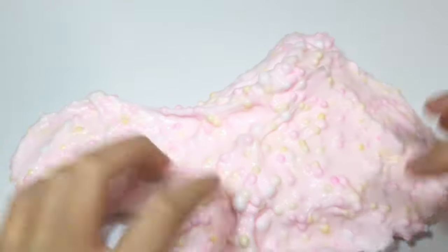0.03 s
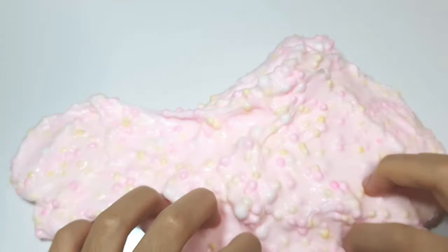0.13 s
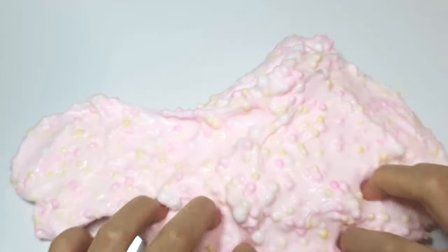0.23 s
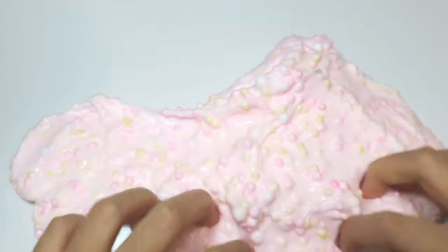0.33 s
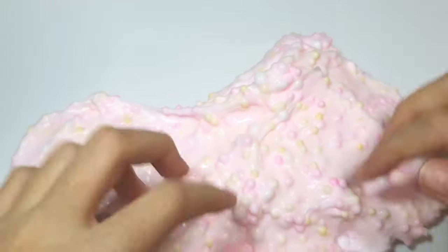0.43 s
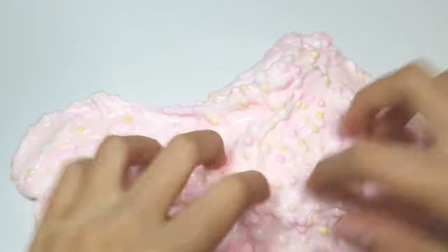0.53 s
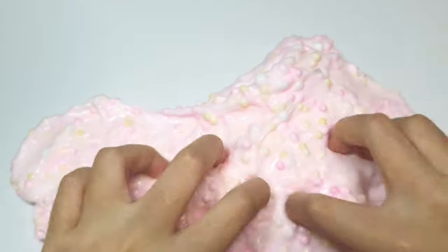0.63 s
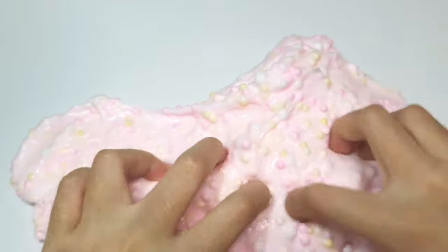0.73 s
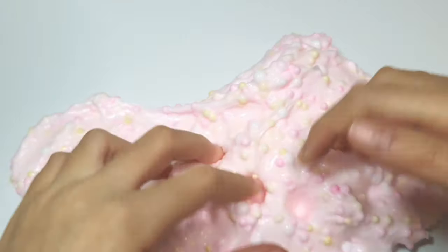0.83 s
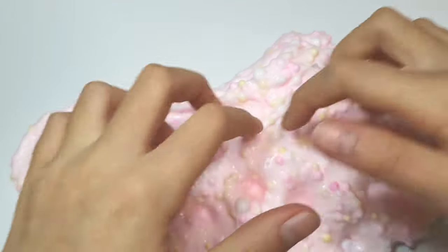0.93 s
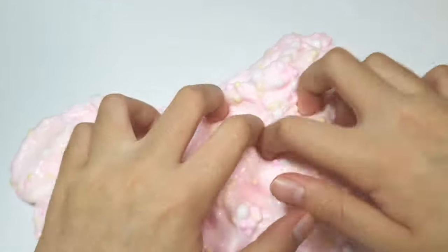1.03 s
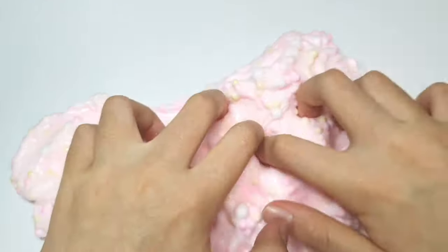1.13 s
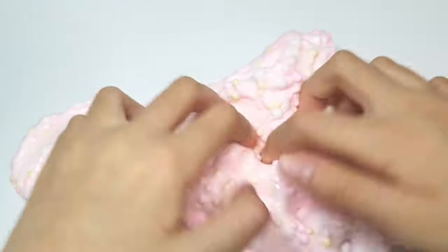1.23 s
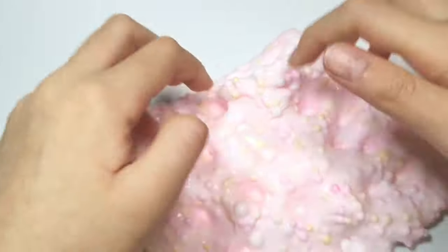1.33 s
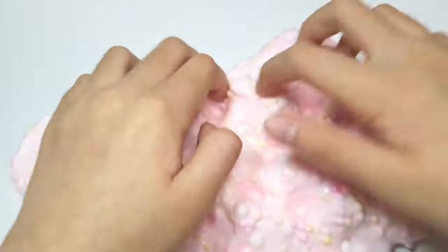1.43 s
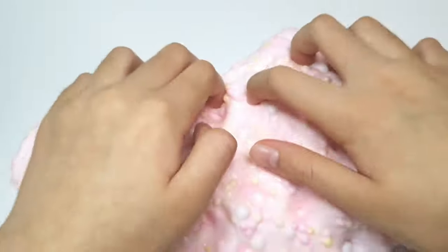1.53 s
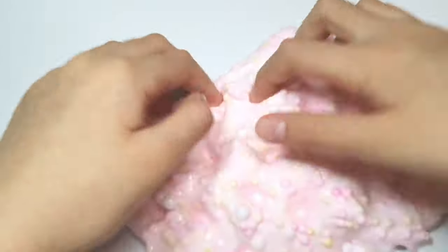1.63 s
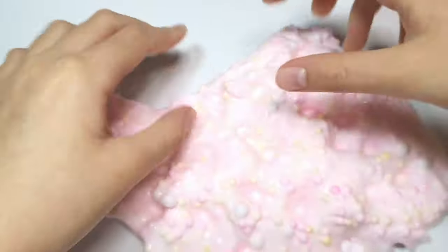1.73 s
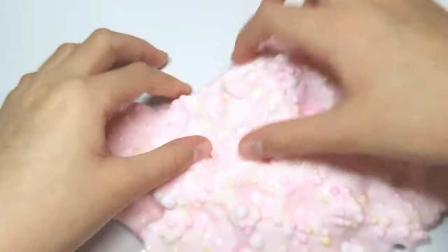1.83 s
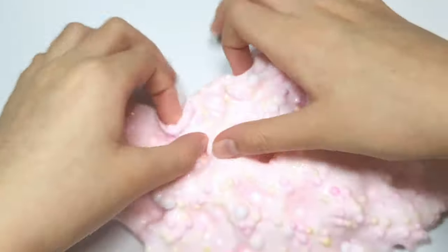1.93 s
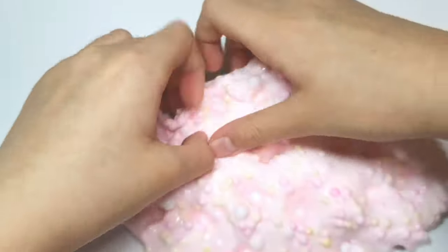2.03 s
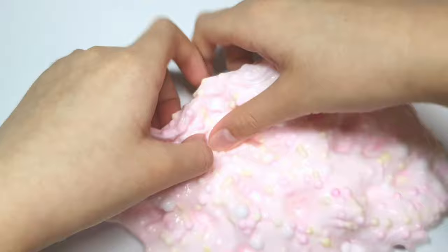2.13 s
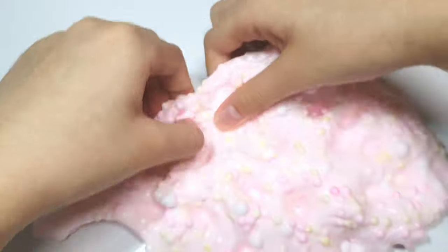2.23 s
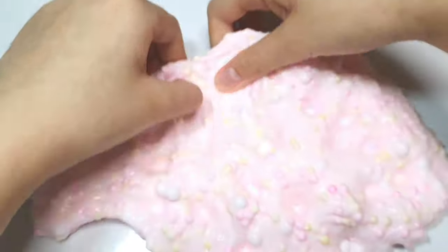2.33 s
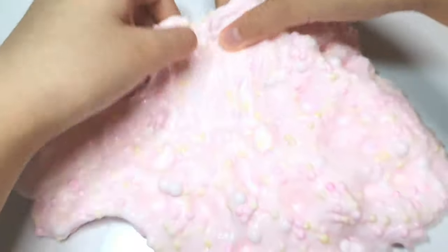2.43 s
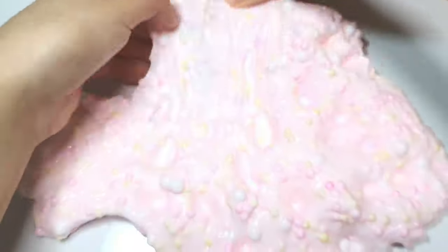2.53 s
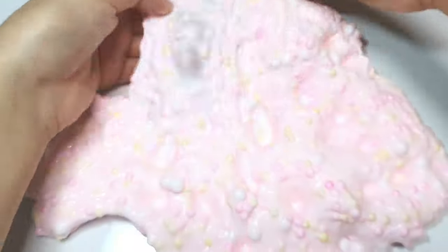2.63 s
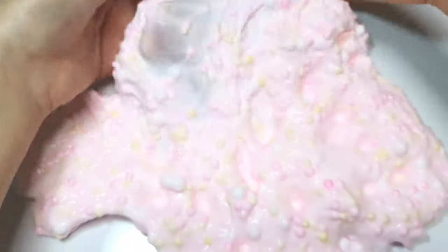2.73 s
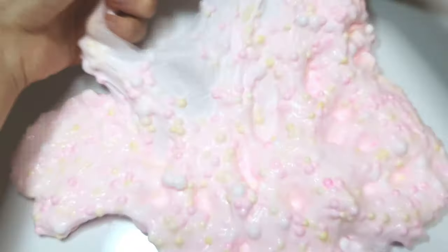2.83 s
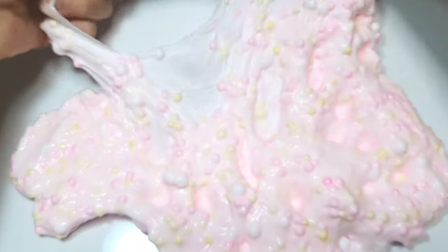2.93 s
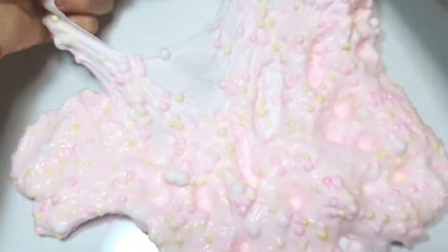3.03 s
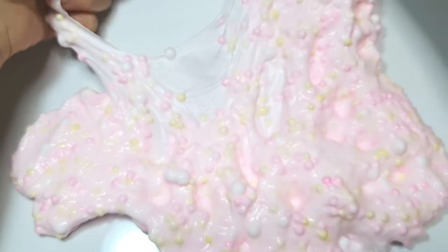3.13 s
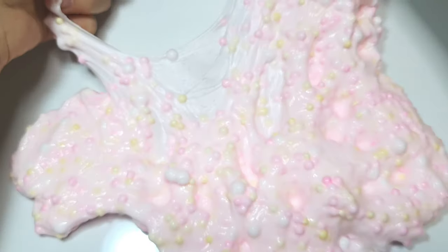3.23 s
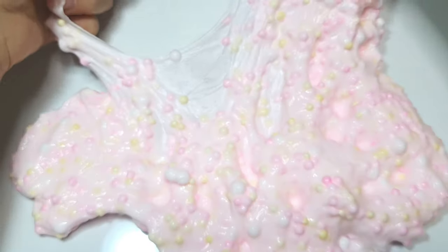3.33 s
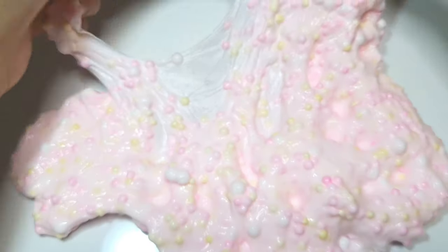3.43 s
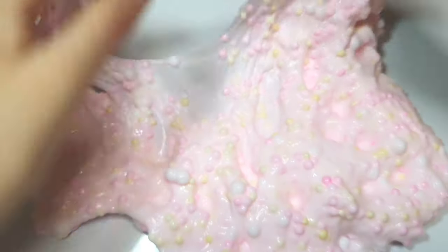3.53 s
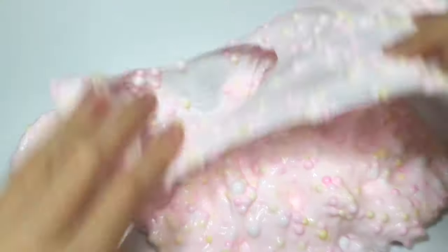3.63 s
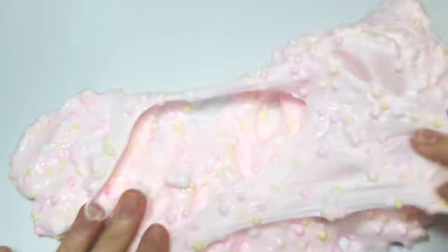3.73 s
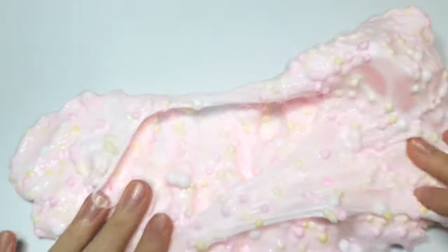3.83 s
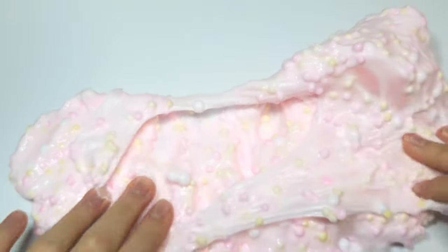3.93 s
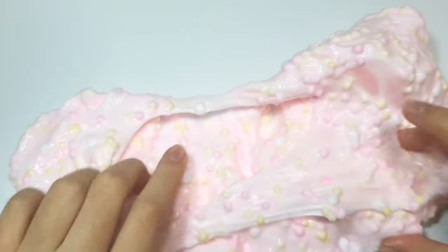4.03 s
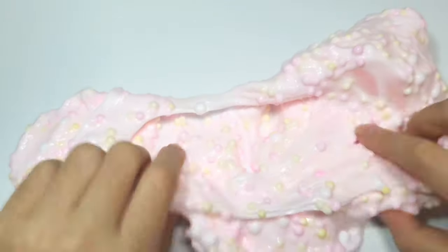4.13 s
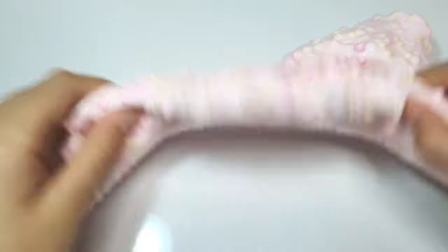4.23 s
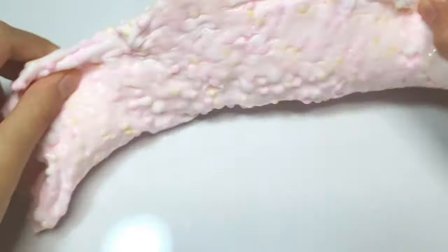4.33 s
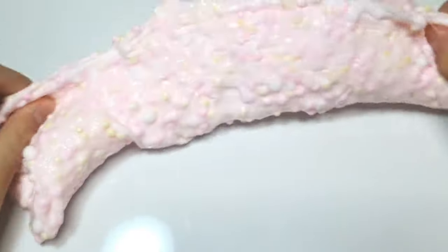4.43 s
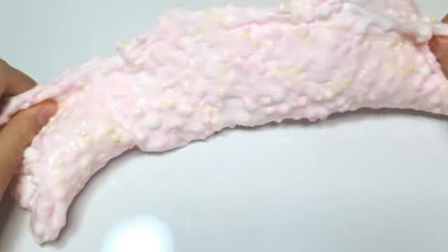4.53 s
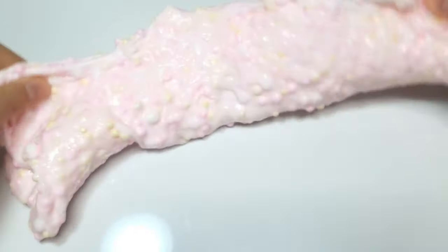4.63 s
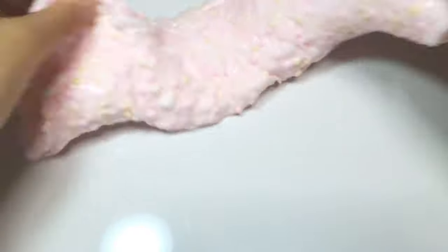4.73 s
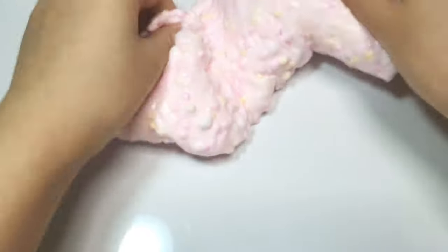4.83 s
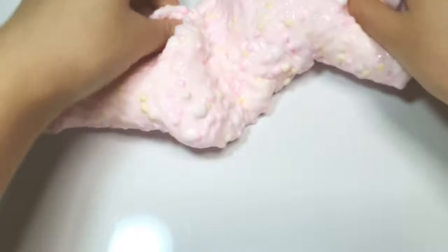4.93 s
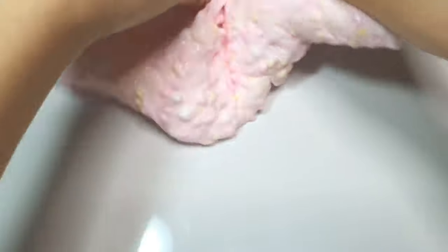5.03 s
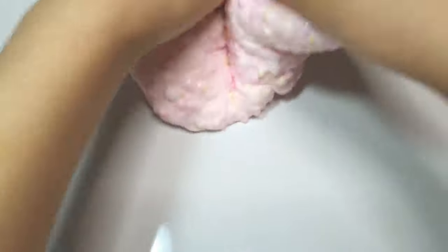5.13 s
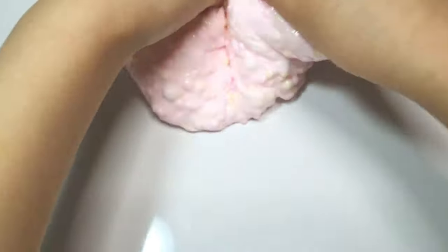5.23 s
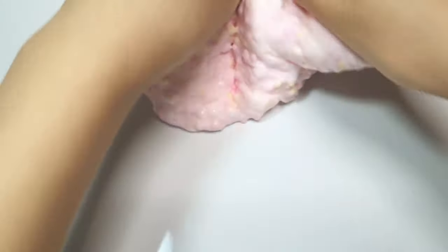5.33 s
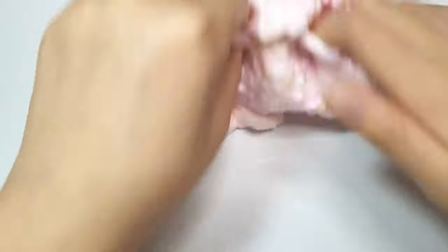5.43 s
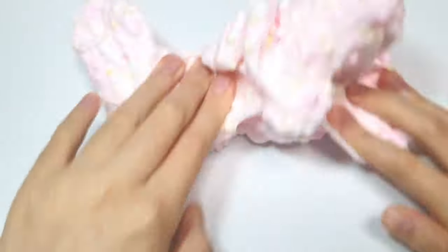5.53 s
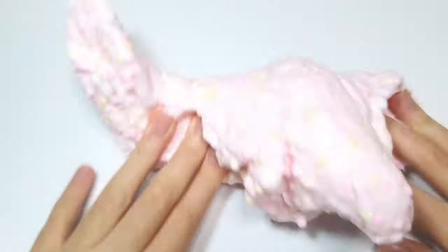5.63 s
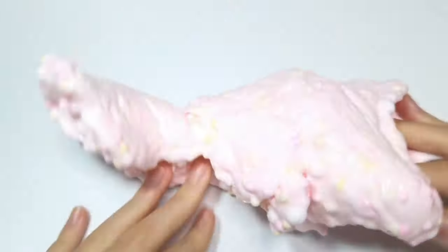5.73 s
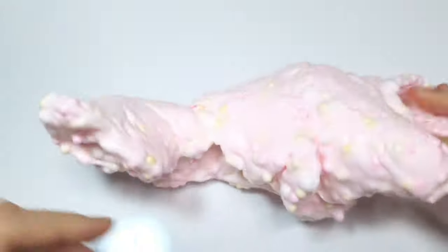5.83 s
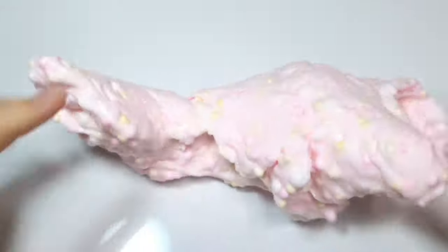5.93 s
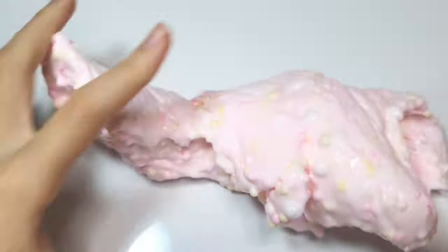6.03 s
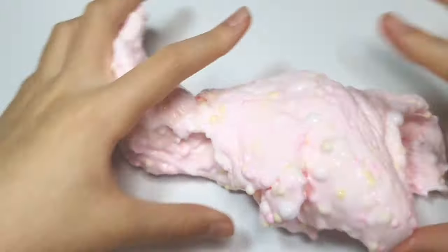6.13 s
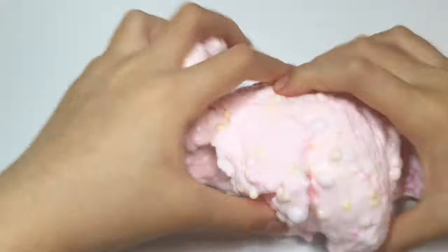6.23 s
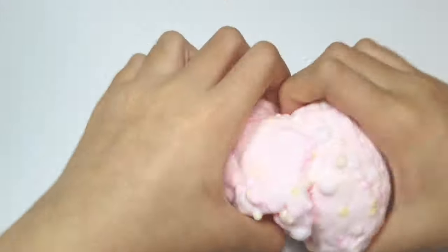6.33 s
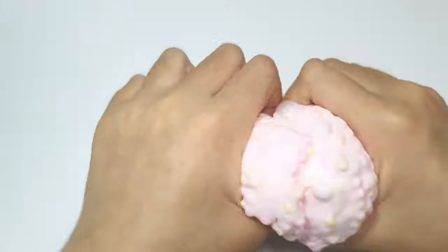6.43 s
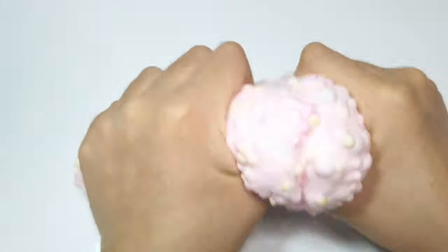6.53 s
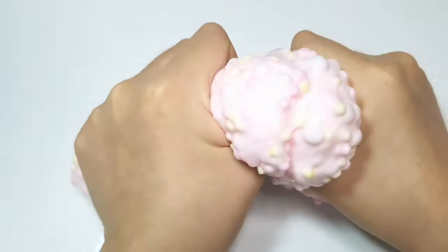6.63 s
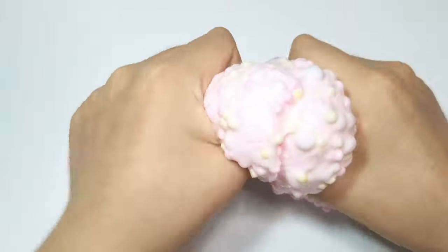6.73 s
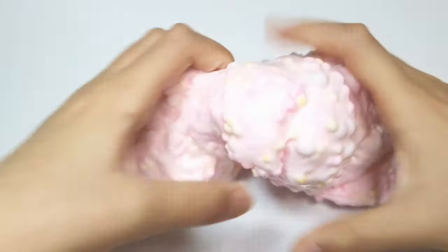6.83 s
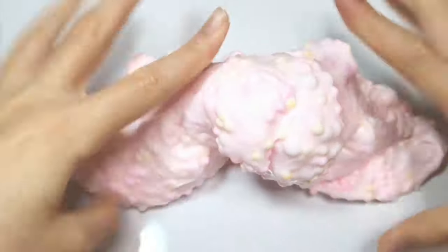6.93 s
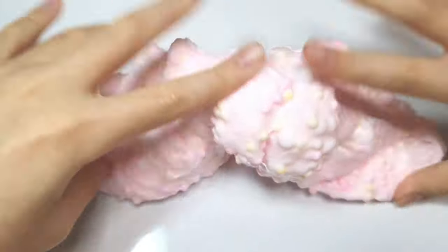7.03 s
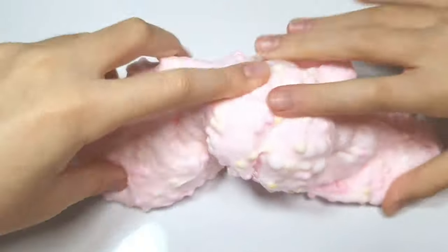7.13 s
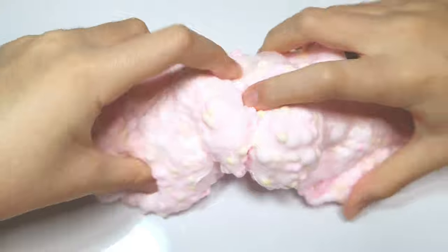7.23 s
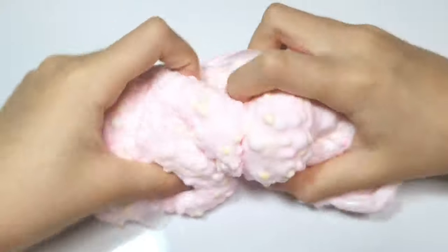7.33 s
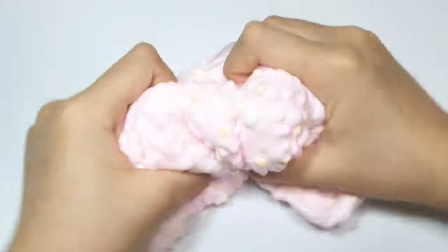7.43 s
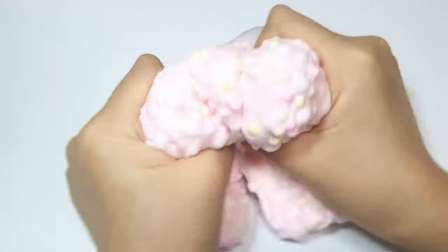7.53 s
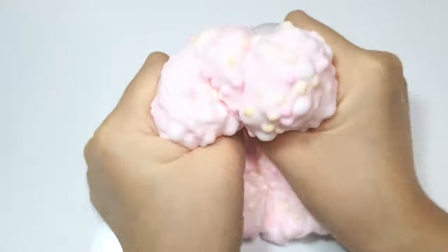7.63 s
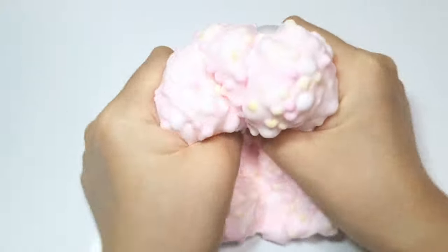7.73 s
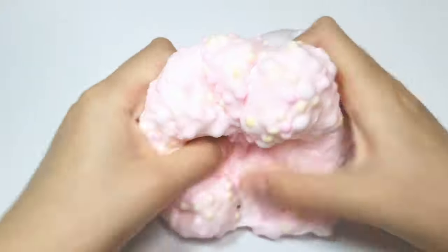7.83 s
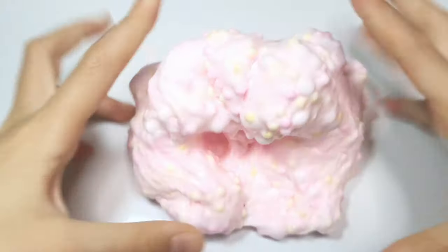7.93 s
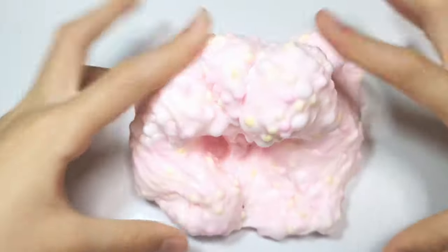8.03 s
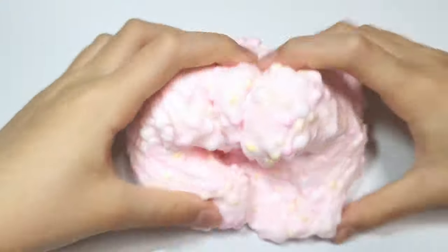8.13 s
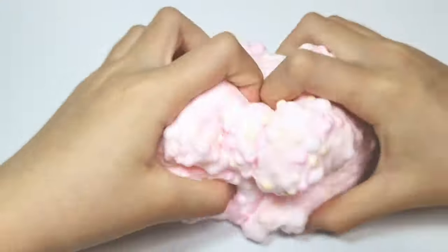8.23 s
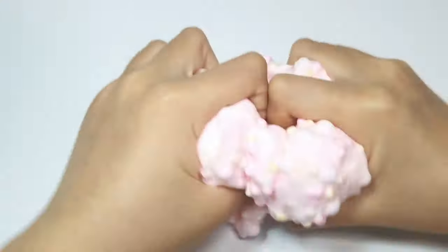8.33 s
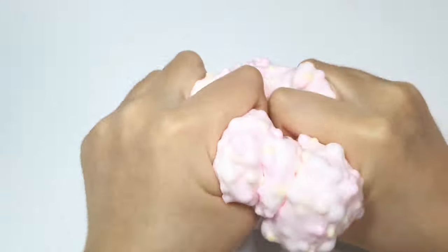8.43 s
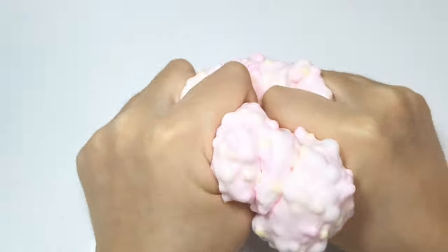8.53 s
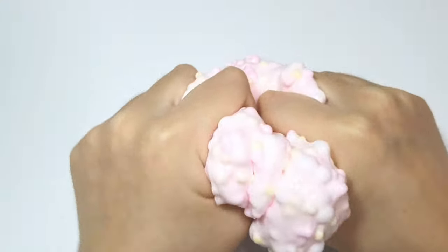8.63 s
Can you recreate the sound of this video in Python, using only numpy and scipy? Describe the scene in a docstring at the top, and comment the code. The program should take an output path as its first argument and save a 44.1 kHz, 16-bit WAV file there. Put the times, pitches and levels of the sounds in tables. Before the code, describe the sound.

Sticky foam-bead slime crackles and squishes close up under kneading fingers, growing into dense, loud popping squeezes in a quiet small room.

```python
"""A hand sweeps over a table and lands; then two hands poke, stretch, fold and squeeze foam-bead slime.
Streams of tiny damped rings crackle and squelch under each stroke, and bigger bubbles snap and ring.
Fingertips ring the table's modes or skid in stick-slip bursts, and soft low pushes make the thuds.
Decaying noise answers as a small bare room, over a steady hush of coloured noise."""
import sys
import numpy as np
from scipy import signal
from scipy.fft import rfft, irfft, next_fast_len
from scipy.io import wavfile
from scipy.ndimage import uniform_filter1d, map_coordinates

SR = 44100
rng = np.random.default_rng(int(sys.argv[2]) if len(sys.argv) > 2 else 0)


def materialize(psi):
    """Save the field psi as 16-bit PCM at rate SR to the path in sys.argv[1].

    A 1-D psi becomes a single channel; in a 2-D psi each row is a channel.
    """
    bounded = np.clip(np.atleast_2d(psi).T, -1, 1)
    quanta = np.round(bounded * 32767).astype(np.int16)
    wavfile.write(sys.argv[1], SR, quanta)


N = 382788
LOW_CUT_HZ, TOP_HZ = 21, 15900  # band limits of the recorder


def amp(db):
    """Decibels to amplitude."""
    return 10 ** (np.asarray(db) / 20)


def unit(x):
    """x scaled to an rms of 1."""
    return x / np.sqrt(np.mean(x ** 2) + 1e-20)


def crest(x):
    """x scaled to a peak of 1."""
    return x / np.abs(x).max()


def along(points, hz):
    """Interpolate (Hz, value) points on a log frequency axis."""
    f, v = np.transpose(points)
    return np.interp(np.log(hz + 1), np.log(f + 1), v)


def wobble(rate):
    """A smooth random curve, rate knots a second."""
    knots = rng.standard_normal(int(N * rate / SR) + 4)
    return map_coordinates(knots, [np.arange(N) * rate / SR])


def filtered(x, response):
    """x times a response of frequency, without phase shift."""
    m = next_fast_len(N + SR // 2)
    return irfft(rfft(x, m) * response(np.fft.rfftfreq(m, 1 / SR)), m)[..., :N]


def coloured(x, spectrum):
    """x shaped by a spectrum, at rms 1."""
    return unit(filtered(x, lambda hz: amp(along(spectrum, hz))))


def band(x, lo_hz, hi_hz, order=2):
    """Causal band-pass."""
    sos = signal.butter(order, [lo_hz, min(hi_hz, SR / 2 - 100)], 'band', fs=SR, output='sos')
    return signal.sosfilt(sos, x)


def pair(size, apart):
    """White noise at two microphones: a shared part plus an opposed part."""
    mid, side = rng.standard_normal((2, size))
    return np.array([mid + apart * side, mid - apart * side])


def add(track, s, sound):
    """Mix a sound into a stereo track at time s."""
    part = track[:, max(round(s * SR), 0):][:, :sound.shape[-1]]
    part += sound[..., :part.shape[1]]


# Strokes of the hands: pokes, then a stretch, a peel and fold, and last the squeezes in both fists.
# Each row: start in seconds, end in seconds, squelch of air pockets in dB, crackle of tearing films in dB.
STROKES = [ (0, 0.045, -66.5, -54.5), (0.235, 0.285, -53.5, -63), (0.47, 0.55, -57.5, -54),
           (0.745, 0.8, -72, -58), (0.894, 0.995, -57.5, -54), (1.345, 1.44, -55, -51.5),
           (1.53, 1.66, -64.5, -70.5), (1.76, 1.83, -57.5, -56), (2.082, 2.17, -52.5, -67),
           (2.16, 2.31, -57.5, -61.5), (2.36, 2.62, -59.5, -60.5), (2.76, 3.0, -72, -66),
           (3.785, 3.95, -60, -65), (4.08, 4.115, -52, -53), (4.185, 4.26, -49, -52.5),
           (4.265, 4.38, -43.5, -48), (4.507, 4.545, -47.5, -57), (4.69, 4.81, -52.5, -54.5),
           (4.88, 4.97, -56.5, -61.5), (5.065, 5.2, -55, -53.5), (5.22, 5.29, -57.5, -60.5),
           (5.41, 5.52, -55, -56), (5.53, 5.69, -59.5, -52.5), (5.71, 5.92, -55, -58.5),
           (5.92, 6.01, -70, -64.5), (6.335, 6.44, -56, -57.5), (6.525, 6.655, -42, -41),
           (6.84, 7.015, -43.5, -44.5), (7.34, 7.47, -50.5, -49.5), (7.505, 7.69, -49, -47),
           (7.875, 8.035, -45.5, -47), (7.915, 7.96, -51, -54), (8.24, 8.32, -58.5, -53.5),
           (8.34, 8.51, -54.5, -51), (8.525, 8.59, -54, -45)]
# Colour of the tearing films. Each row: frequency in Hz, relative level in dB.
CRACKLE = [(1760, -25), (3000, -3), (4700, -5), (10000, -5), (12100, -1), (15100, -5), (16000, -26)]
# Colour of the air pockets. Each row: frequency in Hz, relative level in dB.
SQUELCH = [(240, -15), (400, -1), (850, -11), (1170, -3.5), (1840, 3), (2920, 1), (4200, -21), (5460, -39),
           (9240, -120)]
# Colour of the lump's dull rub. Each row: frequency in Hz, relative level in dB.
RUB = [(15, -31), (25, -2), (59, 0), (217, -6.5), (275, -2), (312, -8), (552, -21), (700, -8), (1540, -120)]
FIZZ_DB, FIZZ_HZ, FIZZ_FROM_S = -4, 2820, 7.3  # level against the strokes' squelch
MERGE_DB = -50.5  # above this strain, single ticks get no louder and merge into the wash


def kneading():
    """Pressed slime tears sticky films and squashes air pockets; it creeps and ticks between strokes."""
    press = pressure(STROKES, blunt_rise=3.7, blunt_fall=3.1)
    creep = np.abs(uniform_filter1d(uniform_filter1d(press, SR // 2), SR // 4))
    squelch_gain, crackle_gain, rub_gain = press + amp(-25) * creep
    clusters = wobble(60)  # pockets burst in uneven clusters

    films = grains(rate=4300, pitch_hz=8760, spread=0.52, cycles=0.98, scatter_db=1.5,
                   pan_db=0.0, lag_s=.00008, size=48)
    crackle = crackle_gain * unit(coloured(films, CRACKLE) * amp(2.7 * clusters))
    crackle = crackle * amp([[-.8], [.8]])  # towards the right

    pockets = grains(rate=1700, pitch_hz=1790, spread=0.48, cycles=2.1, scatter_db=5,
                     pan_db=7.5, lag_s=.00012, size=200)
    squelch = amp(0.2) * squelch_gain * unit(coloured(pockets, SQUELCH) * amp(3.33 * clusters))
    squelch = squelch * amp([[1.1], [-1.1]])  # towards the left

    # in the last squeezes, tightly packed pockets fizz at a higher pitch
    tight = grains(rate=2500, pitch_hz=FIZZ_HZ, spread=0.17, cycles=1.3, scatter_db=3.0,
                   pan_db=8.5, lag_s=.0001, size=160)
    fizz = amp(FIZZ_DB) * squelch_gain * (np.arange(N) / SR > FIZZ_FROM_S) * unit(tight)

    lumps = amp(4 * wobble(30))
    rub = rub_gain * unit(coloured(pair(N, apart=0.26), RUB) * lumps)

    # single beads come unstuck, and middling pockets open, wherever the slime is under strain
    beads = grains(rate=75, pitch_hz=10000, spread=.35, cycles=1.1, scatter_db=5,
                   pan_db=4, lag_s=.00008, size=60)
    blips = grains(rate=80, pitch_hz=1850, spread=.3, cycles=1.5, scatter_db=4,
                   pan_db=3, lag_s=.0001, size=300)
    strain = np.minimum(press + amp(-12) * creep, amp(MERGE_DB))
    ticks = amp(-4.5) * strain[1] * unit(beads) + amp(-7.5) * strain[0] * unit(blips)
    return crackle + squelch + fizz + rub + ticks


# Spans with the lump off the table, where it rubs less. Each row: start in seconds, end in seconds.
LIFTS = [(2.15, 3.7), (6.45, 8.68)]
LIFT_DB = -7  # change of the rub while lifted
RUB_DB, RUB_GROWS = -35, .36  # rub in a stroke of 0 dB squelch; dB it gains per dB of squelch


def pressure(strokes, blunt_rise, blunt_fall):
    """Squelch, crackle and rub gains: strokes swell, hold and ease; a lower blunt rounds that edge."""
    t = np.arange(0, N / SR, .002)
    press = np.zeros((3, len(t)))
    for start, end, squelch_db, crackle_db in strokes:
        u = np.clip((2 * t - start - end) / (end - start), -10, 10)  # -1 at start, 1 at end
        lifted = any(a < start < b for a, b in LIFTS)
        rub_db = RUB_DB + RUB_GROWS * squelch_db + LIFT_DB * lifted
        swell = np.exp(-np.abs(u) ** np.where(u < 0, blunt_rise, blunt_fall))
        press += amp([[squelch_db], [crackle_db], [rub_db]]) * swell
    return np.array([np.interp(np.arange(N) / SR, t, p) for p in press])


POCKET_DRIFT = .15  # the size of the pockets drifts as the fingers move on (log ratio)


def grains(rate, pitch_hz, spread, cycles, scatter_db, pan_db, lag_s, size):
    """A stream of tiny damped rings, rate a second, from scattered places in the lump."""
    count = int(rate * N / SR)
    start = rng.integers(0, N, count)
    pitch, place, strength = rng.standard_normal((3, count, 1))
    drift = POCKET_DRIFT * wobble(20)[start, None]
    hz = np.minimum(pitch_hz * np.exp(spread * pitch + drift), TOP_HZ)
    gain = amp(scatter_db * np.minimum(strength, 2))
    slots = (start[:, None] + np.arange(size)).ravel()
    ears = []
    for side in (1, -1):
        lag = lag_s * np.maximum(-side * place, 0)  # the farther ear hears it later
        turns = hz * np.maximum(np.arange(size) / SR - lag, 0)
        ring = np.sin(2 * np.pi * turns) * np.exp(-turns / cycles)
        ring = gain * amp(side * place * pan_db / 2) * ring
        ears.append(np.bincount(slots, ring.ravel(), N + size)[:N])
    return np.array(ears)


# Bursting bubbles. Each row: time in seconds, snap of the skin in dB before SNAP_DB, its pitch in Hz,
# ring of the cavity in dB before CAVITY_DB, its pitch in Hz, left over right in dB.
POPS = [(0.2455, -43, 4500, -29.5, 1780, 1), (0.2585, -42, 6000, -29, 1860, -7.5),
        (0.3088, -37, 4000, -46, 1790, 3), (0.4095, -41.5, 8900, -63, 1700, 1),
        (0.9059, -29.5, 9000, -35.5, 1250, 0.5), (0.9264, -33, 8000, -38.5, 1260, 4),
        (1.5663, -44.5, 6000, -35.5, 1380, 3), (2.0804, -41.5, 4000, -25.5, 1400, 3),
        (2.385, -37.5, 10800, -51, 1700, 0), (2.269, -23, 13000, -34, 1800, 3),
        (2.2842, -25.5, 12500, -41, 1400, -4), (2.4268, -55, 4000, -34, 1670, 8),
        (2.4562, -41, 7000, -29, 1530, 5), (2.547, -30.5, 12000, -42, 1600, 2),
        (2.779, -48, 4500, -45.5, 2480, 2), (3.8202, -28.5, 6500, -34.5, 2620, 5.5),
        (4.1921, -31.5, 8000, -31.5, 1740, 7), (4.2432, -40, 6000, -32, 1730, 2),
        (4.2681, -24, 13000, -31, 1610, 6), (4.2962, -28.5, 7000, -33, 1730, -1),
        (4.5055, -23.5, 6500, -24.5, 1570, 4), (4.9125, -38, 4000, -27.5, 1520, 9.5),
        (4.9884, -65, 4000, -38, 1890, -2), (5.073, -56, 7000, -31.5, 1920, -1),
        (5.2244, -47, 6000, -34.5, 620, 1.5), (5.26, -47, 9000, -33.5, 950, 2),
        (5.7219, -33, 13500, -37, 1780, 2), (5.7477, -25, 14000, -25.5, 1800, 2.5),
        (5.8629, -39, 6000, -33, 1840, 2), (5.8936, -48, 5000, -31, 910, 4),
        (6.267, -46.5, 10200, -58, 1710, -8), (6.3384, -41, 4500, -36.5, 1280, 0),
        (6.3968, -49, 5000, -36, 1700, 8), (6.476, -34.5, 7000, -32, 1770, 4),
        (6.4865, -28, 13000, -40, 2100, -5), (6.526, -18, 9000, -27.5, 1310, -10),
        (6.5411, -29, 4000, -24.5, 1570, 6), (6.5517, -28, 8500, -32, 1680, 7),
        (6.5847, -37, 8000, -29.5, 1810, 0), (6.6096, -13, 8500, -22.5, 2090, -0.5),
        (6.6201, -14, 11500, -20.5, 1760, 1), (7.152, -42.5, 8000, -40.5, 860, 1),
        (7.4047, -30, 7000, -25, 2400, 2), (7.4102, -27.5, 5500, -36, 1500, 5),
        (7.416, -25, 12000, -55, 1700, 2), (7.4327, -28, 6000, -23.5, 2400, 5),
        (7.4926, -19.5, 12000, -32, 2320, 0), (7.9237, -37, 8000, -35, 2100, 0),
        (7.9353, -37, 5000, -26, 2660, 8), (8.2388, -31, 8000, -38, 1480, 5),
        (8.4501, -24.5, 9000, -40, 1600, -5), (8.4645, -26, 6000, -29, 1660, 7),
        (8.528, -18, 7500, -29.5, 1800, 4), (8.5488, -28, 7000, -28, 1940, 0),
        (8.636, -26, 12500, -40, 1880, 2)]
SNAP_DB, CAVITY_DB = 3.5, 0.5


def pops():
    """A bubble's skin snaps, then its open cavity rings for a few cycles."""
    out, lead = np.zeros((2, N)), SR // 250
    t = (np.arange(SR // 40) - lead) / SR
    rise, after = np.maximum(-t, 0), np.maximum(t, 0)
    for s, snap_db, snap_hz, cavity_db, cavity_hz, pan_db in POPS:
        crack = amp(-60 * rise / 0.0023 - 60 * after / 0.0092)
        fringe = amp(-19 - 60 * rise / 0.009 - 60 * after / 0.016)  # weak noise around the snap
        burst = pair(len(t), apart=0.94) * (crack + fringe)
        snap = crest(band(burst, snap_hz / 1.65, snap_hz * 1.45, order=1))
        ring = np.sin(2 * np.pi * cavity_hz * after) * amp(-60 * after / 0.007)
        splash = pair(len(t), apart=0.67) * amp(-60 * rise / 0.0025 - 60 * after / 0.016)
        splash = band(splash, cavity_hz / 2, cavity_hz * 1.66)
        cavity = crest(ring + 0.62 * crest(splash))
        sound = amp(snap_db + SNAP_DB) * snap + amp(cavity_db + CAVITY_DB) * cavity
        add(out, s - lead / SR, sound * amp([[pan_db / 2], [-pan_db / 2]]))
    return out


# Fingertips pressing through to the table. Each row: time in seconds, level in dB.
TAPS = [(0.26, -41.5), (0.321, -42), (0.377, -43), (0.435, -41), (0.45, -45), (0.526, -43.5),
        (0.708, -41.5), (0.766, -37), (0.78, -43), (0.823, -40), (0.896, -41), (0.989, -41), (1.127, -34),
        (1.151, -40), (1.213, -37.5), (1.266, -42.5), (1.322, -51.5), (1.346, -41), (1.443, -43.5),
        (1.59, -39), (1.648, -40.5), (1.71, -50.5), (1.776, -39.5), (3.943, -38), (3.981, -43.5),
        (5.012, -44.5), (5.256, -40.5), (5.329, -45.5), (5.348, -52), (5.38, -49), (5.893, -40),
        (6.338, -48), (6.434, -42.5)]
# Modes of the table under a fingertip, before each tap's scatter.
# Each row: frequency in Hz, relative level in dB, decay by 60 dB in seconds.
TABLE = [(456, -2.5, 0.082), (484, 2, 0.035), (532, -0.5, 0.027), (590, 0.5, 0.024), (654, -1.5, 0.055),
         (776, -10.5, 0.061)]


def taps():
    """A cushioned fingertip rings the table's modes, scattered per blow, with a wet smack and one rebound."""
    out, t = np.zeros((2, N)), np.arange(SR // 8) / SR
    for s, db in TAPS:
        for count in range(2):
            ring = 0
            for hz, level_db, t60_s in TABLE:
                decay = amp(level_db + rng.normal(0, 5.4) - 60 * t / t60_s)
                ring = ring + decay * np.sin(2 * np.pi * hz * (1 + rng.normal(0, 0.022)) * t)
            ring = crest(ring * (1 - np.exp(-t / 0.0013)))  # cushioned onset
            smack = crest(band(pair(len(t), apart=0.83) * amp(-60 * t / 0.028), 470, 1750))
            delay_s, fall_db = count * rng.uniform(.011, .019), 6 * count
            add(out, s + delay_s, amp(db - fall_db) * (ring + amp(-6.5) * smack))
    return out


# Soft blows of palms and lump on the table. Each row: time in seconds, push in dB before PUSH_DB,
# its pitch in Hz, knock of the table top in dB before KNOCK_DB.
THUDS = [(0.23, -36, 44, -62), (0.652, -35.5, 65, -64), (0.924, -44.5, 190, -42.5), (0.962, -41, 62.7, -54),
         (1.091, -37.5, 59.2, -74), (1.535, -37, 55.6, -69), (1.932, -42.5, 61, -62.5),
         (2.0797, -34, 185, -43.5), (2.932, -48, 97.5, -67), (3.797, -41.5, 55.3, -61),
         (3.882, -37, 55.5, -57), (4.504, -45.5, 122, -47), (4.912, -37.5, 70, -40),
         (5.2245, -40.5, 81, -40.5), (5.889, -44, 222, -50), (6.33, -36.5, 74.4, -53),
         (6.987, -36.5, 95, -66), (7.169, -48.5, 75, -70), (7.279, -54.5, 79.5, -69.5),
         (7.957, -39, 136, -61), (8.024, -39.5, 112, -46.5), (8.522, -42, 52.3, -71)]
PUSH_DB, KNOCK_DB = -0.5, 14
GIVE_CYCLES = 0.147  # the soft mass starts to give this much before the knock


def thuds(table_hz=278):
    """A soft mass gives one low push; a shudder builds up under it, with a knock and a brief hum."""
    out, t = np.zeros((2, N)), np.arange(SR // 3) / SR
    for s, db, hz, knock_db in THUDS:
        turns = hz * t
        push = np.sin(2 * np.pi * turns) * turns ** 2 * np.exp(-turns / 0.41)
        shudder = band(pair(len(t), apart=0.3), hz * 0.19, hz * 1.4)
        shudder = shudder * amp(-60 * t / 0.16) * (1 - np.exp(-turns ** 2))
        decay = amp(-60 * t / 0.022) + amp(-20 - 60 * t / 0.36)  # knock, then hum
        knock = np.sin(2 * np.pi * table_hz * t) * decay * (1 - np.exp(-table_hz * t * 2))
        add(out, s - GIVE_CYCLES / hz, amp(db + PUSH_DB) * (crest(push) + 0.99 * crest(shudder)))
        add(out, s, amp(knock_db + KNOCK_DB) * knock)
    return out


# A damp finger skids on the table.
# Each row: start in seconds, end in seconds, mean slip level in dB, mean pitch of the contact in Hz.
SKIDS = [(2.71, 2.737, -56.5, 1280), (2.794, 2.798, -44, 1270), (2.805, 2.908, -60.5, 1160),
         (2.905, 2.938, -48, 1310), (2.958, 2.964, -50, 1400)]
# Resonances of the contact. Each row: multiple of its pitch, relative level in dB.
SKID = [(0.38, 0), (0.88, 4), (1.13, 2.5)]


def skids(rate_hz=300):
    """Skin sticks and slips unevenly; each slip rings the contact, whose pitch shifts with the grip."""
    out, t = np.zeros((2, N)), np.arange(SR // 50) / SR
    for start, end, db, hz in SKIDS:
        slips = start + np.cumsum(rng.uniform(0.42, 1.6, 60)) / rate_hz
        for s in slips[slips < end]:
            turns = hz * np.exp(0.067 * rng.standard_normal()) * t
            ring = sum(amp(level_db) * np.sin(2 * np.pi * ratio * turns) for ratio, level_db in SKID)
            add(out, s, amp(db + rng.normal(0, 3)) * crest(ring * t * amp(-60 * t / 0.008)))
    return out


# Colour of a hand sweeping over the table. Each row: frequency in Hz, relative level in dB.
SWISH = [(300, -1.5), (1200, -15.5), (2400, -7), (3400, -19.5), (15000, -32)]
SWISH_DB, SWISH_FADE_DB_PER_S, SWISH_END_S = -54.5, 34, .23


def swish():
    """A hand sweeps smoothly towards the slime, slowing until it lands: fading coloured noise."""
    t = np.arange(N) / SR
    speed = amp(SWISH_DB - SWISH_FADE_DB_PER_S * t) * (t < SWISH_END_S)
    return speed * coloured(pair(N, apart=0.46), SWISH)


# Decay of the room. Each row: frequency in Hz, decay by 60 dB in seconds.
ROOM = [(100, 1), (300, 0.47), (15000, 0.51)]


def room(x, gap_s):
    """The walls answer after a short gap; a fresh noise tail every third of a second varies the answer."""
    out, hop = np.zeros((2, N)), SR // 3
    for start in range(0, N, hop):
        hz, t, z = signal.stft(rng.standard_normal((2, SR // 2)), SR, nperseg=256)
        decay = amp(-60 * t / along(ROOM, hz)[:, None])
        tail = signal.istft(z * decay, SR, nperseg=256)[1]
        tail = tail / np.linalg.norm(tail[0])
        add(out, start / SR + gap_s, signal.fftconvolve(x[:, start:start + hop], tail, axes=1))
    return out


# Colour of the background. Each row: frequency in Hz, relative level in dB.
HUSH = [(25, 1.5), (100, -6), (1500, -14.5), (15000, -23)]
HUSH_DB = -75


def hush():
    """Steady coloured noise, wide between the microphones."""
    return amp(HUSH_DB) * coloured(pair(N, apart=0.96), HUSH)


def scene():
    """Slime, table and fingers heard directly, plus the room's answer and the hush."""
    slime = kneading() + pops()
    table = thuds() + skids() + swish()
    fingers = taps()
    walls = room(amp(-10.5) * slime + amp(-9) * table + amp(-9) * fingers, gap_s=.008)
    return slime + table + fingers + walls + hush()


def record(dry):
    """The microphone sheds the deepest rumble; a steep low-pass sets the recorder's band limit."""
    low_cut = signal.butter(3, LOW_CUT_HZ, 'high', fs=SR, output='sos')
    thinned = signal.sosfilt(low_cut, dry)
    return filtered(thinned, lambda hz: 1 / np.sqrt(1 + (hz / TOP_HZ) ** 120))


dry = scene()
out = record(dry)
materialize(out)
```